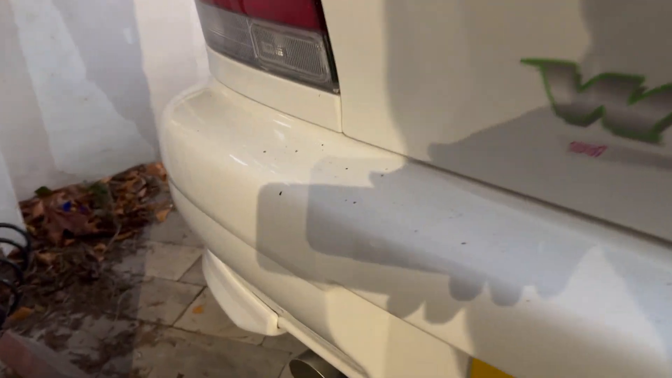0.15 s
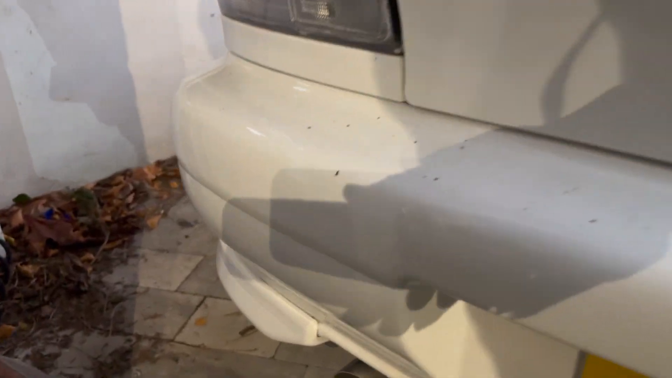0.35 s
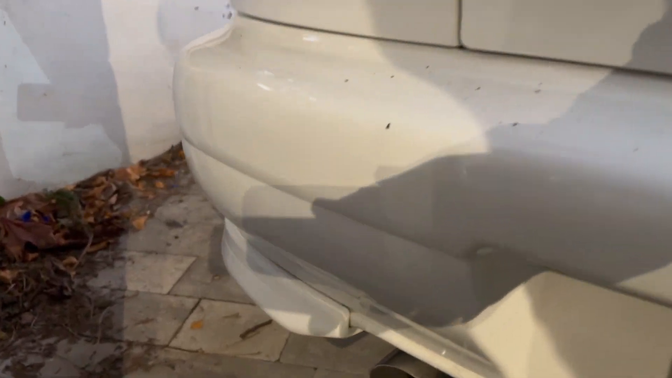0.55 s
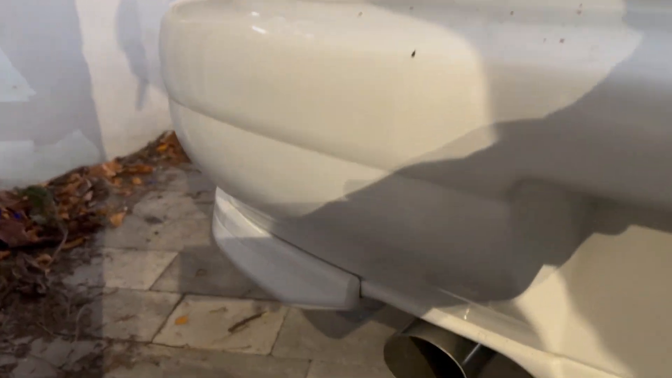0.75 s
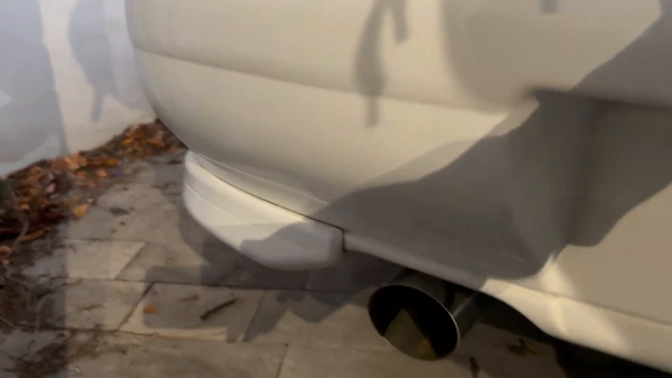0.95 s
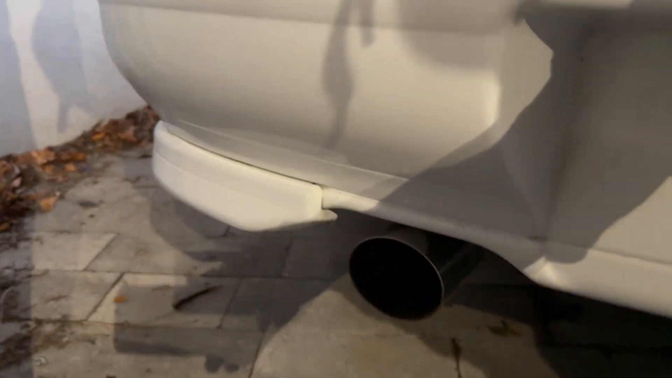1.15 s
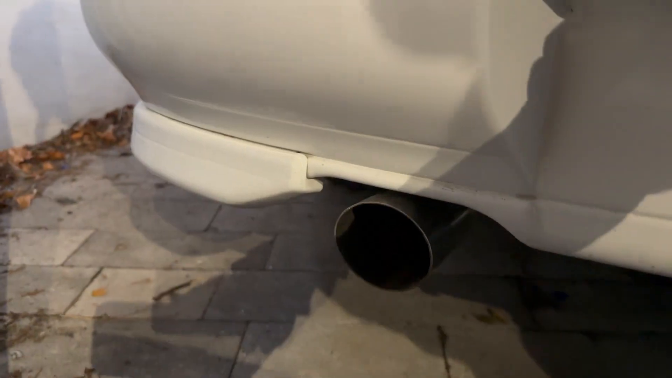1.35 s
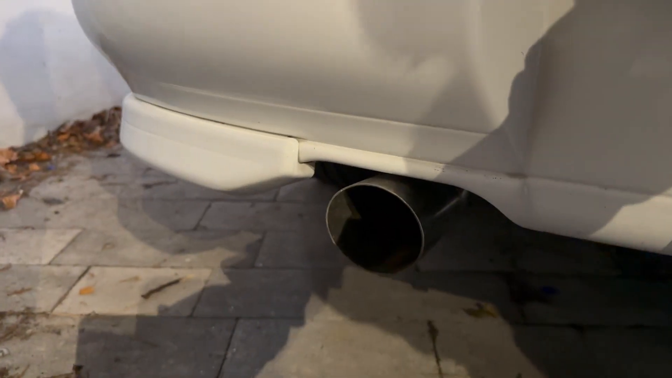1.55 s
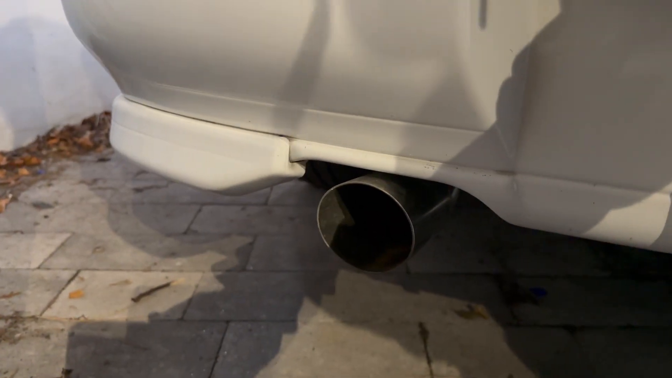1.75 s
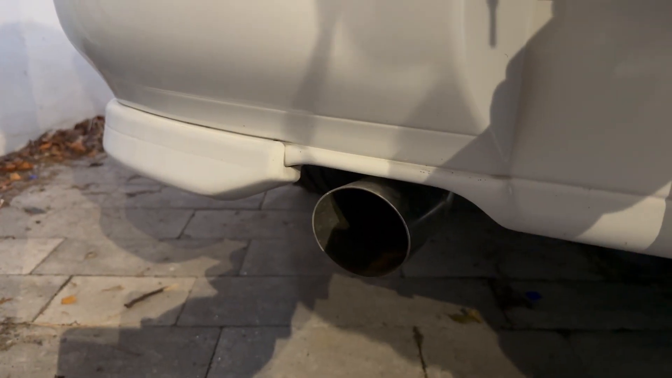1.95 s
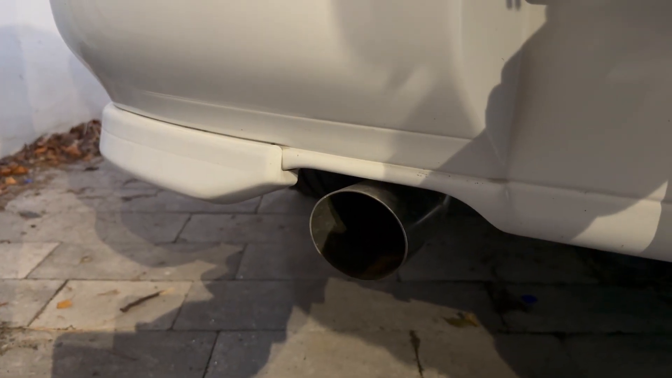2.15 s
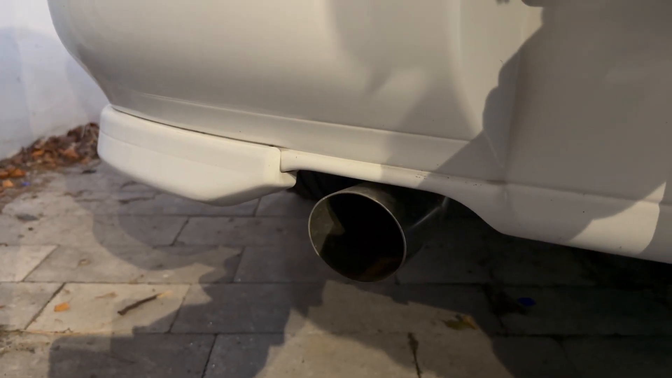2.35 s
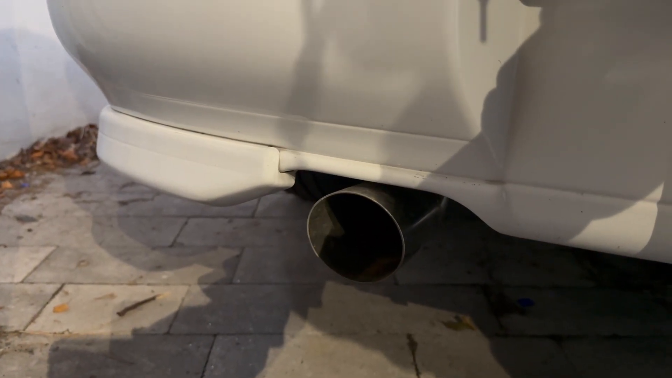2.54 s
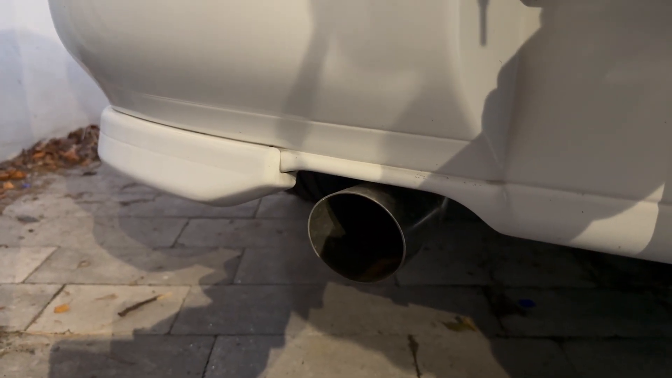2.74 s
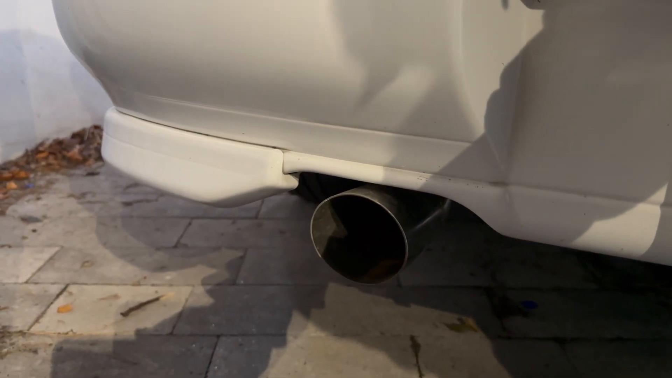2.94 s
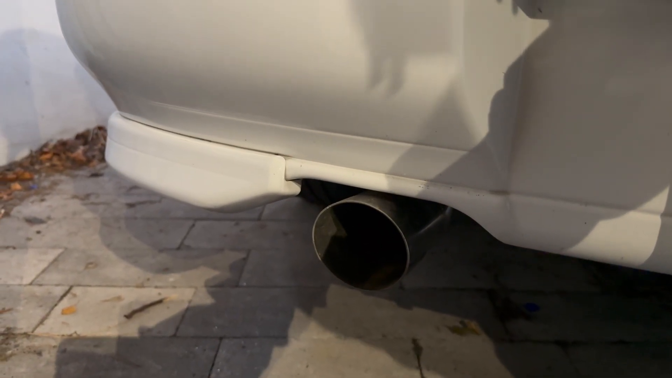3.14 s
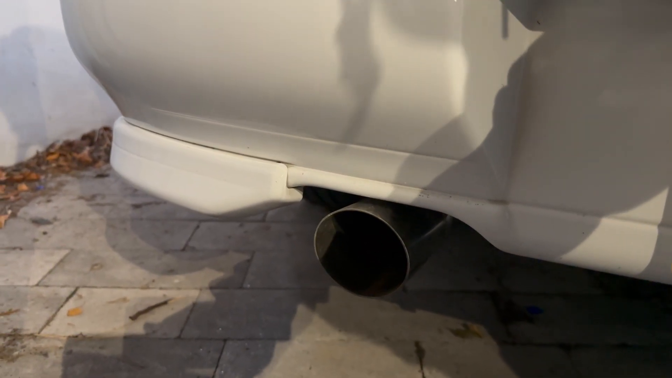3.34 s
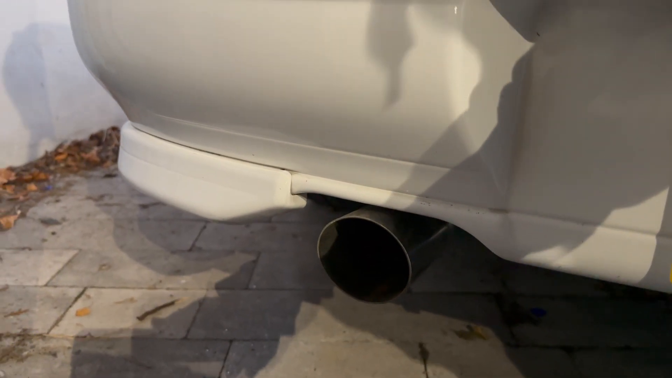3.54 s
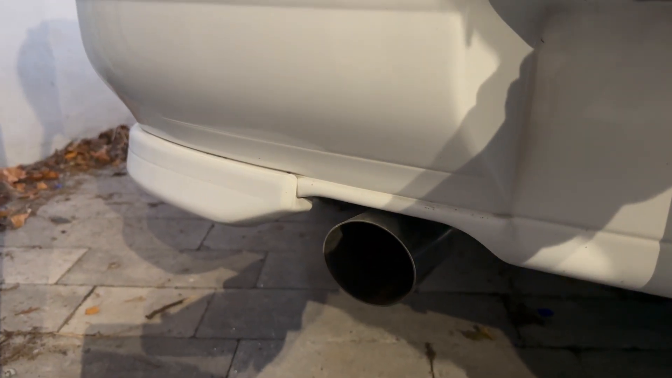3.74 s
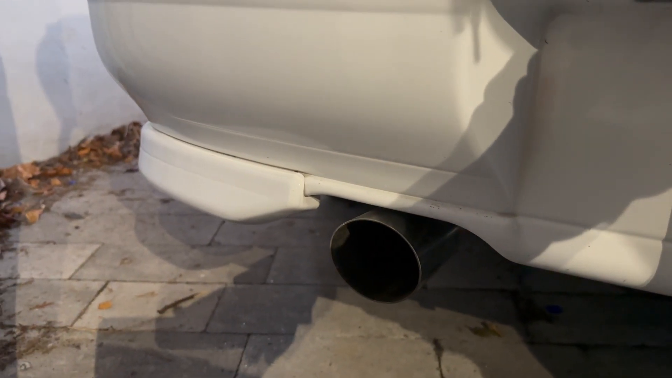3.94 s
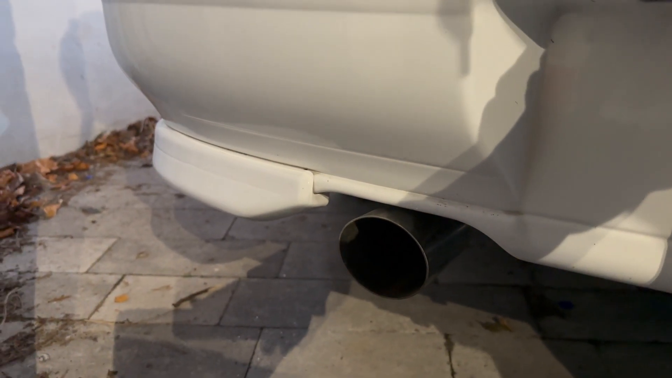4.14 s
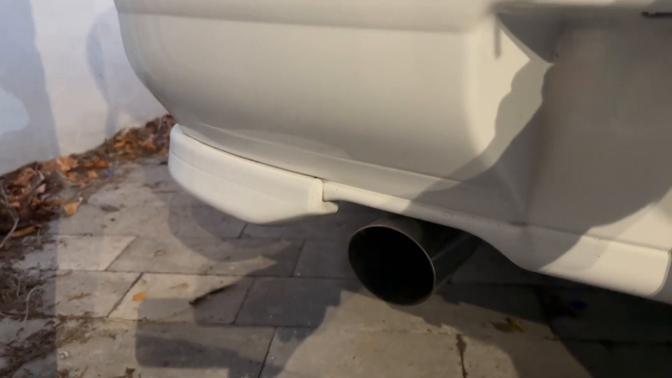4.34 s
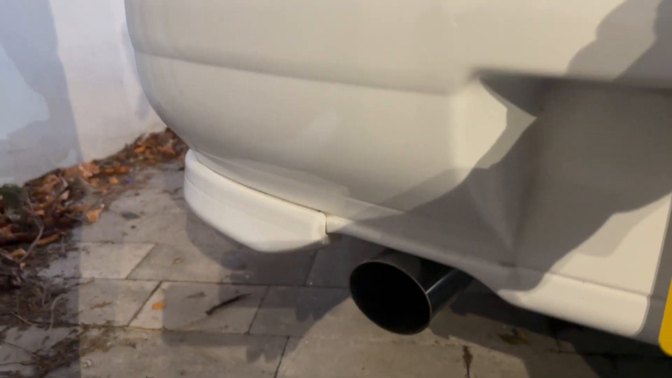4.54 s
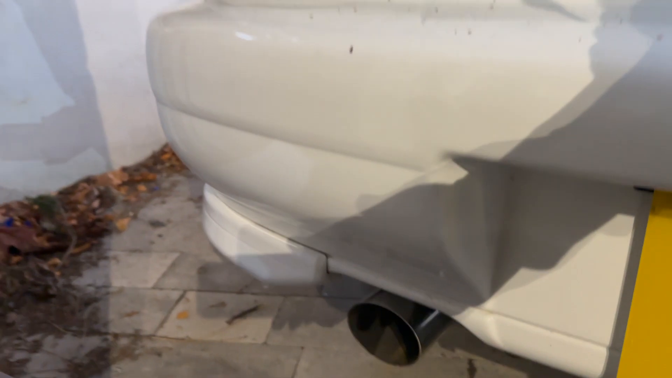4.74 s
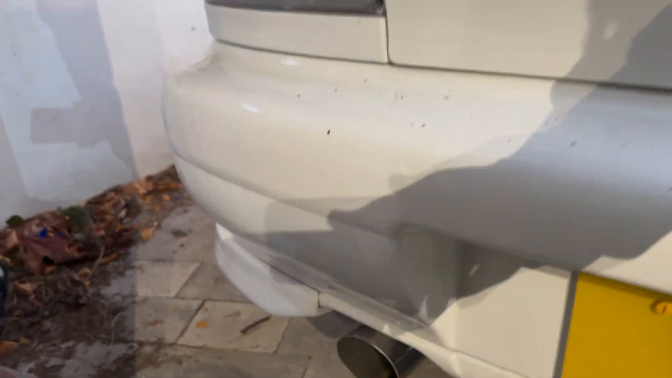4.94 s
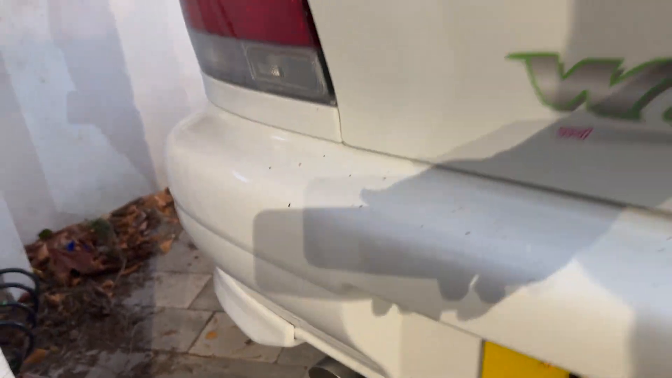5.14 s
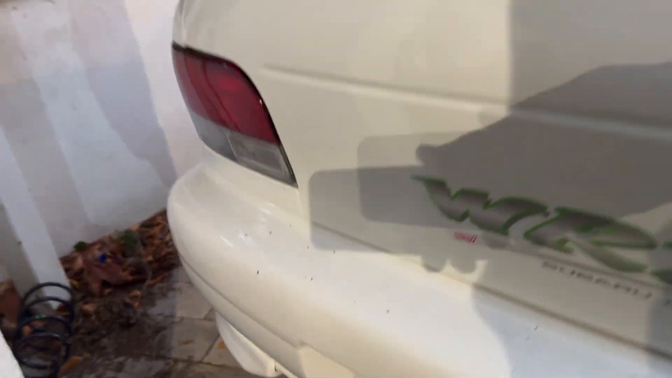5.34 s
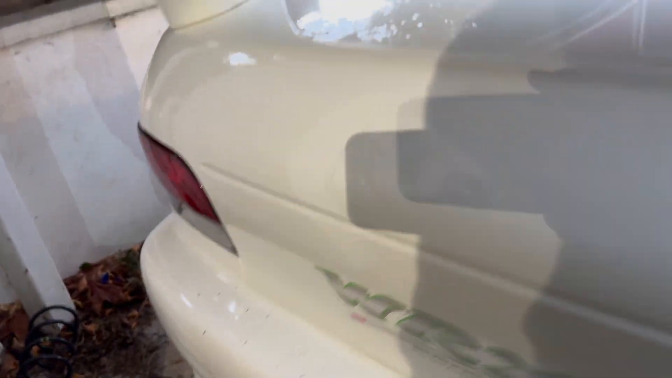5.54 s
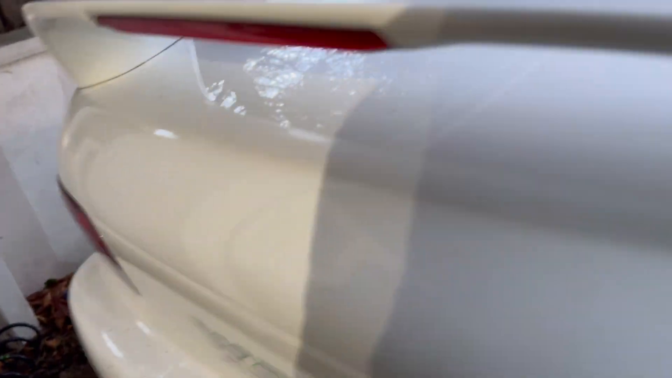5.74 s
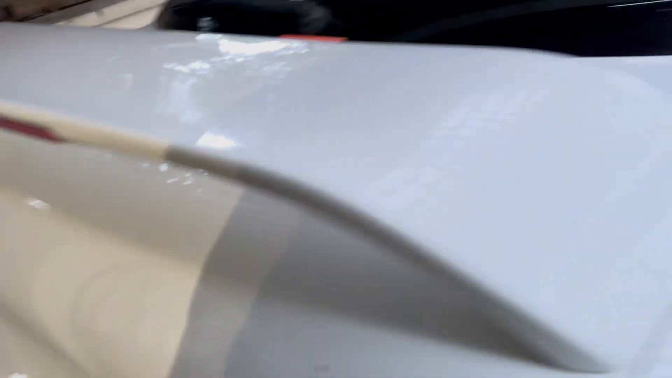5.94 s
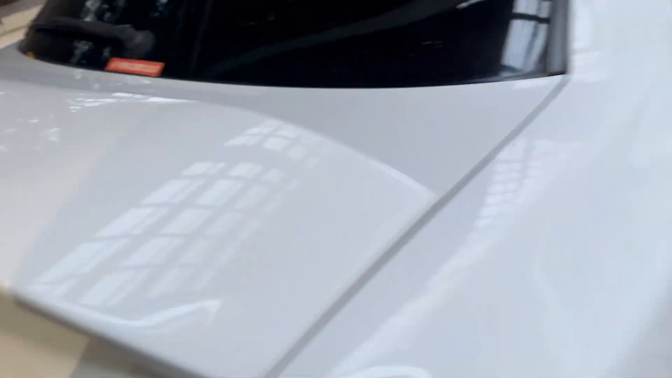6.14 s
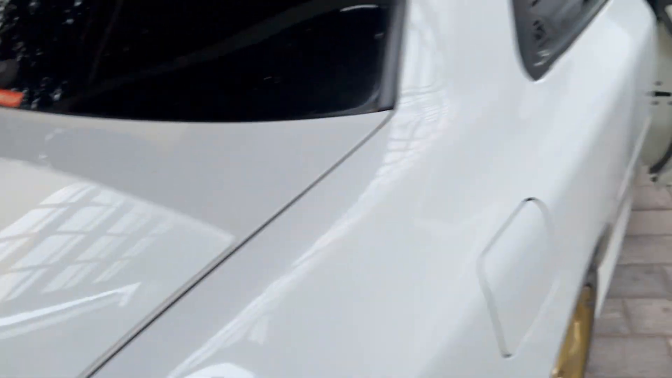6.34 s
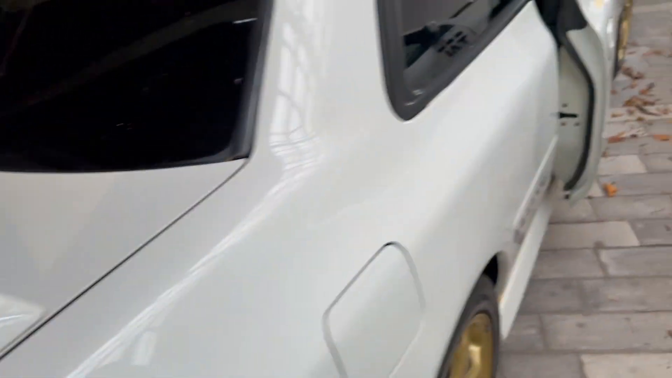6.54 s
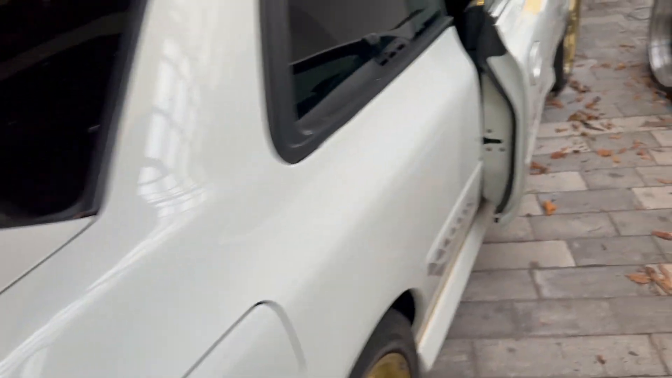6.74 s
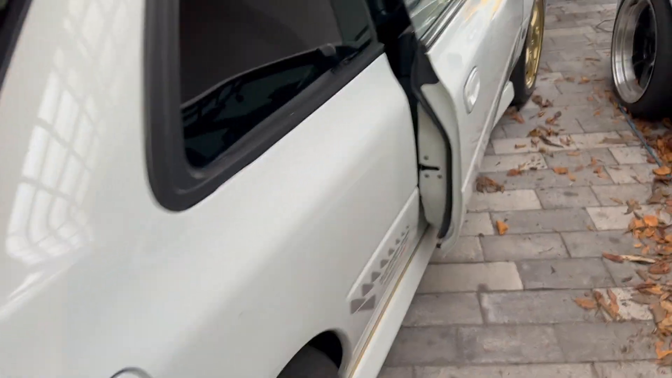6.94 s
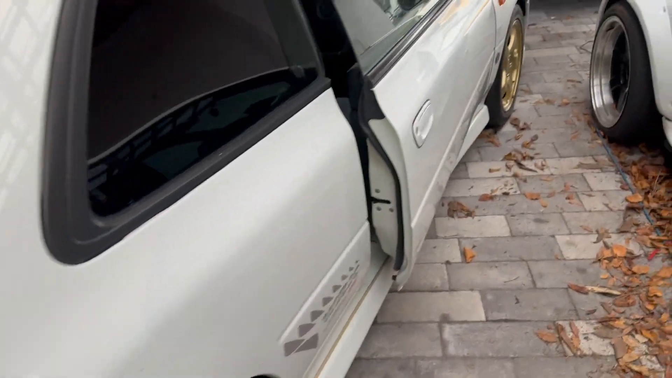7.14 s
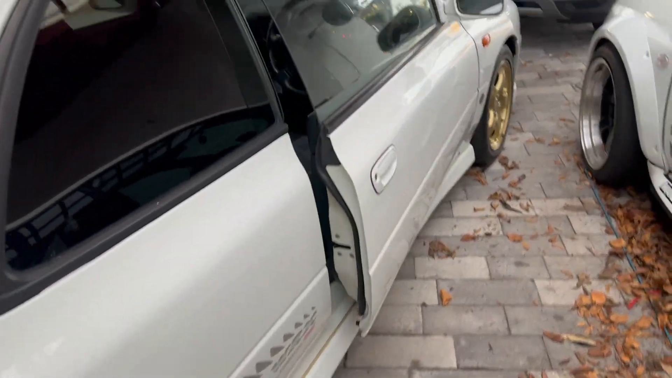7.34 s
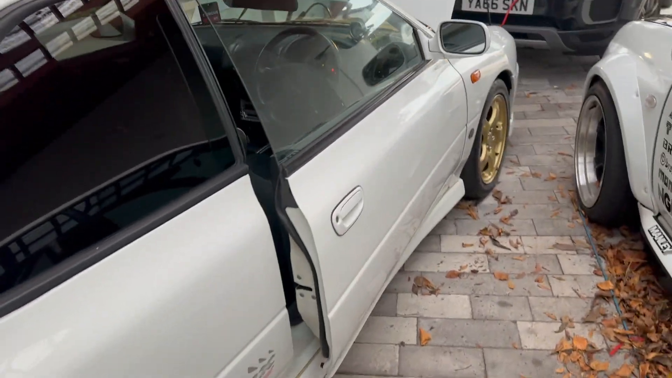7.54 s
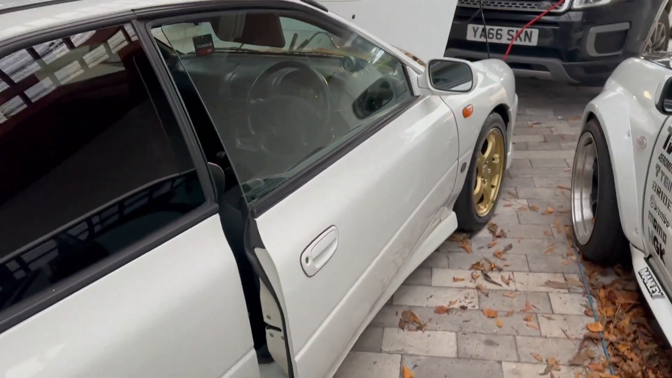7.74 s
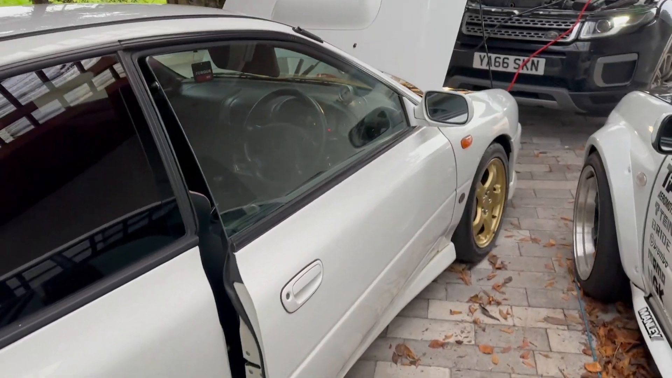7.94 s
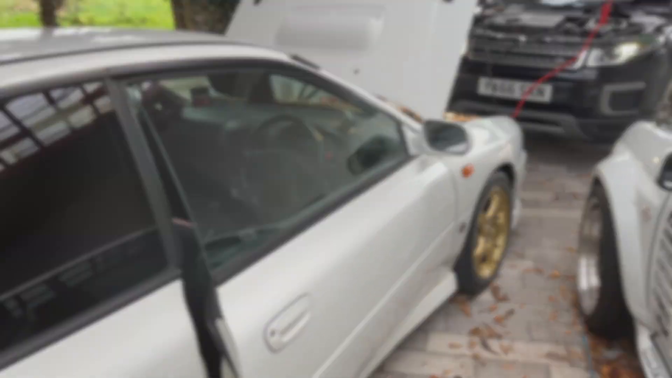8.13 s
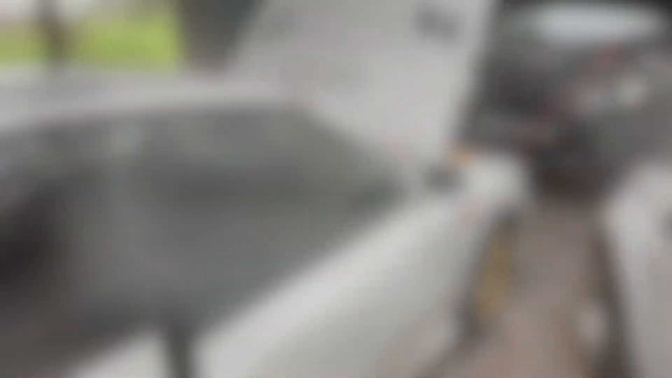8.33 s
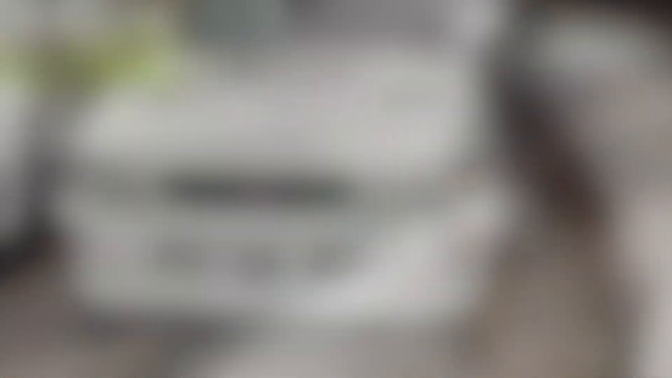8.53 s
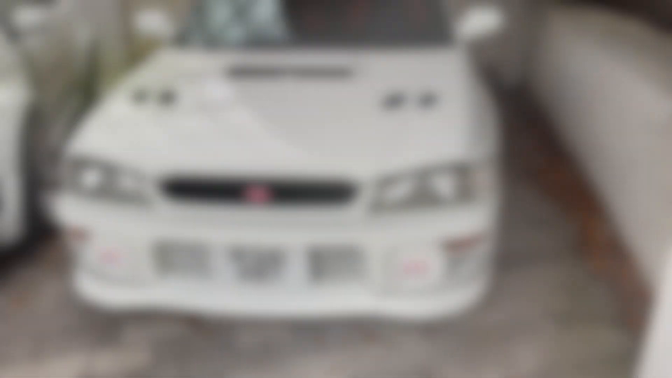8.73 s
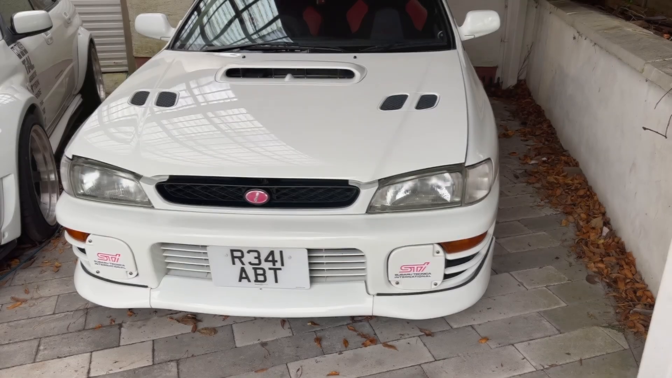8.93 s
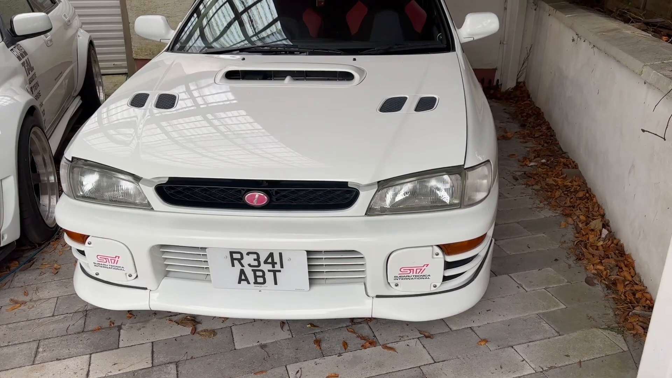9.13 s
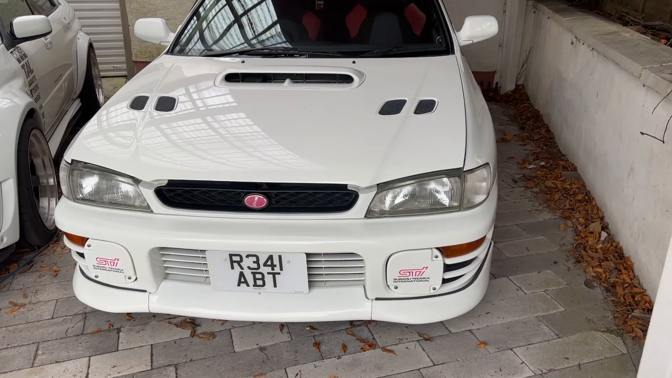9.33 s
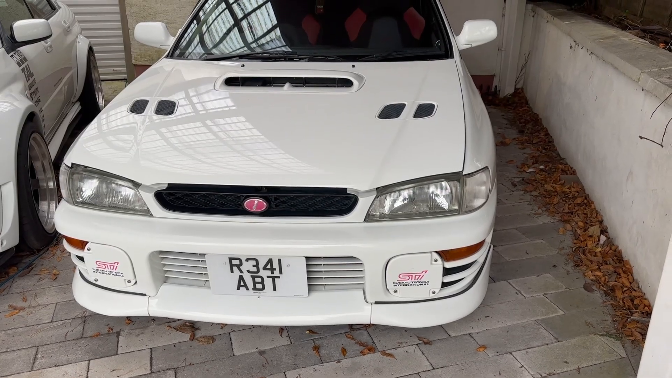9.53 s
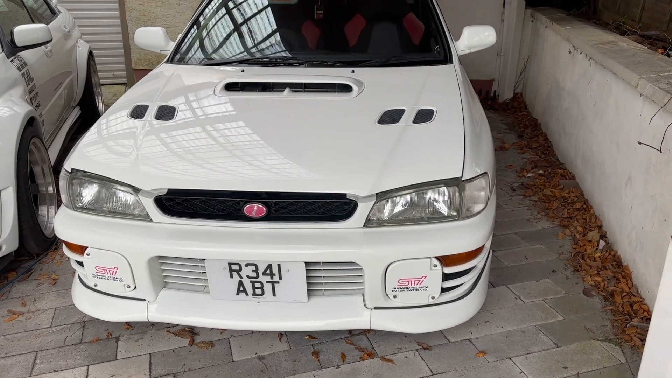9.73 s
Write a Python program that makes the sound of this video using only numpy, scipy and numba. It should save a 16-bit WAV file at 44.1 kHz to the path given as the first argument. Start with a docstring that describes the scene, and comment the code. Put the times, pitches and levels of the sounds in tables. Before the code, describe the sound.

A lumpy four-cylinder idle burbles from a big exhaust, very near and bassy, with spitting, hollow gas puffs and a single thump. After a tiny shoe scrape the microphone walks forward along the car, losing rasp and level while engine-bay hiss and faint fan tones grow. A smooth cross-fade then brings the front of the car, with a steady low drone, ticking valves and whirring belts, outdoors by hard walls.

```python
"""A flat-four idles with a lumpy exhaust throb; each firing barks and puffs gas, some spit, one pops, and a shoe scuffs once.
The listening point is near the tailpipe, then moves along the car while the lope evens out into a hum.
Near the end it cross-fades to the front: a slower idle with a low drone, belt whine and valve ticks.
Uneven pulses ring exhaust modes for the throb; filtered pulses make the bark, and noise puffs the gas.
Wavering sines make the whine, pulsed noise and resonances the ticks, and a short burst of noise the scuff."""
import sys
import numpy as np
from scipy import signal
from scipy.fft import rfft, irfft
from scipy.io import wavfile
from scipy.ndimage import uniform_filter1d
from numba import njit

SR = 44100
rng = np.random.default_rng(int(sys.argv[2]) if len(sys.argv) > 2 else 0)


def master_out(mix):
    """Clip the mix to full scale and print it as 16-bit PCM to the path in sys.argv[1]."""
    frames = np.transpose(np.atleast_2d(mix))
    ceiling = np.clip(frames, -1, 1)
    pcm = np.round(ceiling * 32767).astype(np.int16)
    wavfile.write(sys.argv[1], SR, pcm)


N = 435708
T = np.arange(N) / SR

# slowly hunting idle speed at the rear: t/s, four-stroke cycles per second/Hz
REAR_IDLE = [(0.0, 11.707), (0.6, 11.519), (1.25, 11.665), (1.8, 11.505), (2.05, 11.732), (2.7, 11.876),
             (3.2, 11.48), (3.5, 11.422), (4.25, 11.869), (4.95, 11.485), (5.35, 11.447), (5.9, 11.604),
             (6.65, 11.527), (7.2, 11.874)]
# path along the car: t/s, share of the way from pipe to door/0-1, engine bay hiss level/dB
PATH = [(0, 0.4, -49.5), (.7, 0.27, -49.5), (2, 0.44, -51.5), (4.6, 0.43, -55.5), (5.7, 0.78, -55.5),
        (6.2, 0.93, -54.5), (7.2, 0.99, -52), (8.2, 1, -50)]
# colour of the direct bark and the pop: f/Hz, relative level/dB
BARK_COLOUR = [(310, 2), (400, 1), (475, 1.5), (560, 1.5), (650, -4), (715, -9.5), (750, -6.5),
               (830, -10.5), (910, -11), (980, -18.5), (1040, -16.5), (1300, -34.5)]
# overall colour of bright noise, with a dip near 11 kHz: f/Hz, relative level/dB
BRIGHT_COLOUR = [(2500, -6.5), (3200, -10.5), (4200, 0.5), (6000, -3), (7200, -1), (8500, -2.5), (9600, -3),
                 (11000, -24), (15000, -5.5)]
POP_S = 3.0005


def undb(db):
    """Decibels to amplitude gain."""
    return 10 ** (np.asarray(db) / 20)


def unit(x):
    """Scale to rms 1."""
    return x / np.sqrt(np.mean(x ** 2))


def curves(rows):
    """Join each column of a table by straight lines in time."""
    s, *columns = np.transpose(rows)
    return [np.interp(T, s, column) for column in columns]


def wander(rate_hz):
    """Smoothed random steps give a slow drift with a spread near 1."""
    hold = int(SR / rate_hz)
    steps = np.repeat(rng.standard_normal(N // hold + 1), hold)
    return 1.1 * uniform_filter1d(uniform_filter1d(steps, hold), hold)[:N]


def air(side_db):
    """Stereo white noise; the side level against the middle sets its width."""
    mid, side = rng.standard_normal((2, N))
    return unit(mid + undb(side_db) * side * np.array([[1], [-1]]))


def colour(x, points, size=4096):
    """Minimum-phase filter through f/Hz, level/dB points, with steep falls beyond both ends; rms 1."""
    hz, db = np.transpose(points)
    octave = np.log2(np.maximum(np.arange(size // 2 + 1) * SR / size, 1))
    knots = np.log2(hz)
    beyond = np.minimum(np.abs(octave - np.clip(octave, knots[0], knots[-1])), 2)
    cepstrum = irfft(np.log(undb(np.interp(octave, knots, db) - 30 * beyond)))
    # folding the cepstrum makes the filter causal
    cepstrum[1:size // 2] *= 2
    cepstrum[size // 2 + 1:] = 0
    response = irfft(np.exp(rfft(cepstrum)))
    return unit(signal.fftconvolve(np.atleast_2d(x), response[None], axes=1)[:, :N])


def resonate(x, modes):
    """Sum band-pass filters (f/Hz, width/Hz, level/dB) of alternating polarity; rms 1."""
    total = 0
    for k, (hz, width, db) in enumerate(modes):
        mode = signal.lfilter(*signal.iirpeak(hz, hz / width, fs=SR), x)
        total = total + (-1) ** k * undb(db) * mode
    return unit(total)


@njit
def ring(x, hz, width):
    """State-variable band-pass whose centre frequency moves."""
    y, band, low = np.empty(len(x)), 0., 0.
    for i in range(len(x)):
        g, k = np.tan(np.pi * hz[i] / SR), width / hz[i]
        v = (band + g * (x[i] - low)) / (1 + g * (g + k))
        band, low, y[i] = 2 * v - band, low + 2 * g * v, k * v
    return y


def sweep(x, hz, width_hz):
    """Pass both channels through a moving resonance; rms 1."""
    return unit(np.array([ring(channel, hz, float(width_hz)) for channel in x]))


def echoes(x, fall_s):
    """Dense reflections off paving and walls smear pulses without colouring them; rms 1."""
    t = T[:N // 40]
    response = rfft(rng.standard_normal((2, len(t))) * np.exp(-t / fall_s))
    response = response + 2 * response[0]  # a shared part narrows the stereo image
    tails = irfft(response / np.abs(response))[:, :len(t) // 2]
    return unit(signal.oaconvolve(x[None], tails, axes=1)[:, :N])


def fire(idle, places, db, scatter_db, lag_s=0, jitter_s=0):
    """Pulses at set places in each engine cycle, with random strength and optional random timing."""
    turns = np.cumsum(curves(idle)[0]) / SR
    when = (np.arange(-1, int(turns[-1]) + 1)[:, None] + places).ravel()
    louder, later = rng.standard_normal((len(when), 2)).T
    strength = undb(np.resize(db, len(when)) + scatter_db * louder)
    at = np.searchsorted(turns, when) + ((lag_s + jitter_s * later) * SR).astype(int)
    running = when > -1 / 10  # keeps pulses due just before the start
    return np.bincount(np.maximum(at, 0), strength * running, minlength=N)[:N]


def kicks(s, db):
    """Single pulses at given times."""
    return np.bincount((np.asarray(s) * SR).astype(int), undb(db), minlength=N)


def puffs(pulses, rise_s, fall_s):
    """Envelope that swells after each pulse and dies away; rms 1."""
    for s in (rise_s, fall_s):
        pulses = signal.lfilter([1], [1, -np.exp(-1 / (s * SR))], pulses + 1e-18)
    return unit(pulses)


def boom(pulses, modes, moved):
    """Firings pass a bass-only silencer and a bank of narrow bands whose balance shifts with place."""
    silencer = signal.butter(5, [40, 300], "band", fs=SR, output="sos")
    here = [(hz, width, db + moved * change) for hz, width, db, change in modes]
    return unit(resonate(signal.sosfilt(silencer, pulses), here))


def whine(lines, speed, waver, flutter_db):
    """Sine tones (f/Hz, level/dB) follow a speed ratio while pitch and level wander."""
    out = 0
    for hz, db in lines:
        phase = 2 * np.pi * np.cumsum(hz * speed * (1 + waver * wander(30))) / SR
        out = out + np.sqrt(2) * undb(db + flutter_db * wander(12)) * np.sin(phase)
    return out


def exhaust():
    """Uneven firings ring the pipe into a throb, with bark and gas; the lope evens out along the car."""
    # firings: place in cycle/0-1, strength in line with the pipe/dB
    firings = [(0.176, 0.0), (0.423, -0.4), (0.678, -9), (0.935, -4.3)]
    # the same firings away from the line of the pipe: strength/dB
    aside_db = [2.5, 3, -5.5, -4.5]
    # exhaust resonances: f/Hz, width/Hz, level at the pipe/dB, change beside the car/dB
    tail_modes = [(49.13, 4.64, -8.5, 5.5), (94.4, 72, -8, -2.5), (126.2, 8.23, 3, 4.5),
                  (174.7, 12.1, -10.5, 7), (223.3, 62, -15.5, 2.5), (280.8, 10, -16.5, 2)]
    # distance from the tailpipe: t/s, distance/m
    distance = [(0, 0.66), (.4, 0.7), (1.25, 0.42), (2.0, 0.48), (3.0, 0.47), (4.35, 0.44), (5.2, 1.17),
                (5.9, 2.13), (6.5, 3.87), (8.1, 2.7)]
    # how nearly the listening point faces into the pipe: t/s, alignment/0-1
    aim_path = [(0, 0.3), (0.603, 0.1), (1.198, 0.85), (4.201, 0.88), (4.8, 0.1), (8.2, 0.3)]
    # evening of the lope into a hum: t/s, share of even firings/0-1
    evening = [(5.4, 0), (6.3, 0.2), (7.25, 0.25), (7.75, 0.9)]
    boom_1m_db, bark_1m_db = -14.5, -36  # mix gains at 1 m
    notch_hz, notch_width_hz = 436, 51
    ease_db = -3  # throb and bark soften after the pop

    metres = np.maximum(curves(distance)[0], 1 / 10)
    beside, aim, even = (np.clip(curves(table)[0], 0, 1) for table in (PATH, aim_path, evening))
    places, firing_db = np.transpose(firings)
    in_line = fire(REAR_IDLE, places, firing_db, scatter_db=0.56)
    aside = fire(REAR_IDLE, places, aside_db, scatter_db=0.62)
    loping = aim * in_line + (1 - aim) * aside
    steady = undb(-1.5) * fire(REAR_IDLE, places, [0], scatter_db=1.5)
    throb = boom((1 - even) * loping + even * steady, tail_modes, beside)
    note = undb(boom_1m_db) * throb + undb(bark_1m_db) * bark(beside, aim, even, steady)
    # the tailpipe cancels one narrow band
    note = signal.lfilter(*signal.iirnotch(notch_hz, notch_hz / notch_width_hz, fs=SR), note)
    effort = undb(np.interp(T, [POP_S, POP_S + 0.034], [0, ease_db]))
    return effort * note / metres + rasp(beside, aim)


def bark(beside, aim, even, steady):
    """Steep pulse fronts bark with turbulence behind them; off the pipe's line they scatter into a mutter."""
    # fronts, the second firing split in three by unequal headers: place in cycle/0-1, strength/dB
    steep_fronts = [(0.229, 0), (0.481, -9), (0.526, -8), (0.576, -8.5), (0.742, -5), (0.993, -5)]
    # colour of the mutter under the bumper: f/Hz, relative level/dB
    under_colour = [(310, -5), (400, -5.5), (490, 2.5), (560, -2), (660, -5.5), (735, -16.5), (900, -14),
                    (1150, -27)]
    # level of that mutter within the bark: t/s, level/dB
    mutter = [(0, -6), (1.2, -4.5), (3.0, -8.5), (4.4, -5), (5.0, -2.5), (5.7, -1.5), (6.15, -3),
              (8.2, -18.5)]
    # colour of the bark beside the car: f/Hz, relative level/dB
    side_colour = [(300, -1), (360, -0.5), (400, -1), (480, -7), (600, -14), (720, -16.5), (1000, -27)]
    beside_db = 4  # bark that escapes under the sill

    fronts = fire(REAR_IDLE, *np.transpose(steep_fronts), scatter_db=1.2, jitter_s=.00016)
    turbulence = undb(-12) * air(side_db=-8) * puffs(fronts, rise_s=.001, fall_s=.009)
    direct = colour(unit(fronts) + turbulence, BARK_COLOUR)
    direct = undb(1.7) * (1 - beside) * (0.73 + .45 * aim) * direct
    under = colour(echoes(fronts, fall_s=.01) + 2.2 * turbulence, under_colour)
    side_pulses = (1 - even) * fronts + even * steady / 2
    side = colour(echoes(side_pulses, fall_s=.02) + 1.5 * turbulence, side_colour)
    return direct + undb(curves(mutter)[0]) * under + undb(beside_db) * beside ** 2 * side


def rasp(beside, aim):
    """Pulsed noise rasps and rings in the pipe, then fizzes at its rim a few milliseconds later."""
    # gas spits, against an ordinary puff: t/s, added rasp pulse level/dB, added fizz pulse level/dB
    spit_table = [(0.412, -2, -11.5), (0.493, -3.5, -9), (0.583, 0.5, -13.5), (0.668, 0, -8),
                  (0.842, 2.5, -10.5), (0.992, -9, -3.5), (1.187, 0.5, 3), (1.359, -4, 1),
                  (1.790, -3.5, -0.5), (1.877, -2.5, -0.5), (2.219, -6.5, -2.5), (2.386, -8, -2),
                  (2.512, 0.5, -7), (2.575, -1.5, -10), (3.000, 0, -1), (3.109, 2, -6), (3.154, -4, -3.5),
                  (3.195, 1, -8.5), (3.239, -2, -4), (3.327, -1, -4), (3.413, -1, -4.5), (3.588, 4, -1.5),
                  (3.678, -3, -3), (4.984, 0.5, -10), (5.137, 5.5, -7), (5.31, 5.5, -11.5)]
    # gas colour in line with the pipe: f/Hz, relative level/dB
    gas_colour = [(710, -30), (1200, 3.5), (1270, -14.5), (1370, 4), (1540, -1), (1760, -7), (1900, 2),
                  (1990, -0.5), (2350, 1.5), (2470, -2.5), (2700, -25), (3200, -34), (4160, -58),
                  (7040, -120)]
    # gas colour off the line of the pipe: f/Hz, relative level/dB
    above_colour = [(650, -14.5), (900, 2.5), (1100, 1), (1200, 3), (1330, -2.5), (1440, 6), (1590, -22),
                    (1680, -7), (1770, -6.5), (1970, -3), (2410, -19), (2650, -11), (3020, -29.5),
                    (3200, -29), (4160, -47.5), (7040, -120)]
    # steel tip resonances: f/Hz, width/Hz, level/dB
    tip_modes = [(1510, 30, -6), (9600, 45, -26.5), (9800, 40, -25.5)]
    # hollow ring that shifts with place: t/s, f/Hz, level/dB
    hollow_ring = [(0, 2130, -9), (.3, 2130, -7), (.55, 1974, 2.5), (.68, 1882, -3.5), (.85, 2100, 0),
                   (1.3, 2330, -4), (4.2, 2393, -4), (4.7, 2120, 2.5), (5.0, 2073, -0.5), (5.35, 1912, 2.5),
                   (5.8, 1880, -5)]
    # lower ring that shifts with place: t/s, f/Hz, level/dB
    low_ring = [(0, 1384, -1), (.45, 1470, -9), (.9, 1402, -7), (2.2, 1530, -10), (3.35, 1570, 2),
                (4.1, 1474, -7.5), (4.7, 1413, 1.5), (5.35, 1437, 0.5), (5.8, 1430, -9)]
    hollow_width_hz, low_width_hz = 125, 96
    rasp_db, fizz_db = -46.5, -63  # mix gains at the start
    settle_db_per_s = 1.75  # the gas quietens as the cold engine settles

    s, spit_rasp_db, spit_fizz_db = np.transpose(spit_table)
    spits = kicks(s, spit_rasp_db)
    exposed = 1 - .87 * beside
    flow = exposed * gas_flow(scatter_db=2.6, extra=spits) + 0.15
    jet = air(side_db=-1) * flow
    in_line = colour(jet, gas_colour) + undb(-9.0) * resonate(jet, tip_modes)
    gas = aim * in_line + (1 - aim) * undb(1.5) * colour(jet, above_colour)
    rings = 0
    for table, width in ((hollow_ring, hollow_width_hz), (low_ring, low_width_hz)):
        hz, db = curves(table)
        pulsed = air(side_db=-8) * gas_flow(scatter_db=3.5, extra=spits)
        rings = rings + undb(db) * sweep(pulsed, hz, width)
    rings = signal.sosfilt(signal.butter(4, 2700, fs=SR, output="sos"), rings)
    rim = gas_flow(scatter_db=1.3, extra=kicks(s + .003, spit_fizz_db), lag_s=.004)
    fizz = colour(air(side_db=-3.5) * (rim + 0.1), BRIGHT_COLOUR) * (1 - beside ** 2)
    mix = undb(rasp_db) * (gas + exposed * rings) + undb(fizz_db) * fizz
    return undb(-settle_db_per_s * T) * mix


def gas_flow(scatter_db, extra, lag_s=0):
    """Each firing's puff of gas swells and dies within a few milliseconds."""
    # puffs: place in cycle/0-1, strength/dB
    gas_puffs = [(0.218, -1), (0.462, -1), (0.733, 2.5), (0.977, 0)]
    pulses = fire(REAR_IDLE, *np.transpose(gas_puffs), scatter_db, lag_s)
    return puffs(pulses + extra, rise_s=0.0013, fall_s=0.0034)


def pop():
    """One firing burns much harder: a single coloured pulse thumps out of the pipe."""
    thump = colour(kicks([POP_S], [0]), BARK_COLOUR)
    return undb(-13) * thump / np.abs(thump).max()  # peak gain before the rear mix


def front():
    """The exhaust drones under the car, panels buzz, and valves clatter in the rush of the belts."""
    # idle speed: t/s, four-stroke cycles per second/Hz
    idle = [(8, 9.85), (8.9, 9.9), (9.25, 10.0), (9.88, 10.1)]
    # firings: place in cycle/0-1, strength/dB
    firings = [(0.244, 0.0), (0.494, -1.035), (0.694, -4.454), (0.994, -7.817)]
    # filter bands shaping the drone; a close pair of opposite polarity makes one steep peak:
    # f/Hz, width/Hz, level/dB, change as the listening point steps aside/dB
    drone_bands = [(47, 5.8, -23.5, 0.5), (84.63, 8.3, 1.5, 4), (84.3, 9.17, 1.38, 3.5),
                   (109.6, 11.8, -10, -6), (136.8, 17, -14.5, -5.5), (152.2, 9.8, -9.5, -4.5),
                   (194, 26, -20, 4), (239.2, 11, -20.5, 2.5), (270, 340, -35.5, -4)]
    # panel colour: f/Hz, relative level/dB
    body_colour = [(160, -36.5), (280, 6.5), (315, 1.5), (361, -4), (387, -14.5), (475, -10.5), (516, -9),
                   (570, -18), (680, -18), (804, -34.5), (900, -23), (1170, -39), (1980, -120)]
    # clatter and rush colour: f/Hz, relative level/dB
    bay_colour = [(400, 8.5), (700, -3.5), (980, -4), (1300, -8.5), (2000, -10.5), (2900, -13.5),
                  (3800, -16), (5200, -17.5), (6200, -22), (7100, -20.5), (9500, -21.5), (11000, -44.5),
                  (14000, -21.5), (16000, -37)]
    # metal parts rung by the valve gear: f/Hz, width/Hz, level/dB
    bay_modes = [(1150, 30, -5.5), (1884, 26, -0.5), (2370, 47, -1.5), (2860, 32, -0.5), (3290, 70, -6)]
    # belt and pulley tones: f/Hz at 10 cycles per second, level before the front gain/dB
    belt_tones = [(357, -44.5), (517, -45), (603, -57.5), (972, -53.5), (7085, -72), (8020, -76)]
    # rising whirr of a pulley: t/s, f/Hz
    whirr = [(8.4, 942), (9.0, 957), (9.35, 972), (9.88, 984)]
    whirr_width_hz, whirr_db = 43, -54.5
    clatter_db, bay_ring_db = -48, -55

    pulses = fire(idle, *np.transpose(firings), scatter_db=0.9)
    drone = boom(pulses, drone_bands, moved=np.interp(T, [8.9, 9.6], [0, 1]))
    buzz = undb(-7) * echoes(pulses, fall_s=.02) + undb(-18) * air(side_db=-8)
    panels = colour(unit(pulses) + buzz, body_colour)
    # each valve ticks once a cycle with a clatter of its own
    valve_places = np.linspace(0, 1, 8, endpoint=False)
    valves = [fire(idle, [place], [0], scatter_db=3, jitter_s=.00015) for place in valve_places]
    clatter = colour(sum(echoes(valve, fall_s=.012) for valve in valves), bay_colour)
    ticks = puffs(sum(valves), rise_s=.0003, fall_s=0.018)
    rings = resonate(air(side_db=-13) * ticks, bay_modes)
    rush = colour(air(side_db=0) * (1 + 0.12 * ticks), bay_colour)
    bay = undb(-41.5 + .5 * wander(9.9)) * rush
    bay = bay + undb(clatter_db) * clatter + undb(bay_ring_db) * rings
    # a thin hiss swells once
    swell = np.exp(-.5 * ((T - 8.85) / 0.071) ** 2)
    sizzle = resonate(air(side_db=0), [(5400, 370, 0)]) * swell
    belts = whine(belt_tones, curves(idle)[0] / 10, waver=.005, flutter_db=2.0)
    belts = belts + undb(whirr_db) * sweep(air(side_db=-5), curves(whirr)[0], whirr_width_hz)
    return undb(-16.0) * drone + undb(-34.5) * panels + bay + undb(-58.0) * sizzle + belts


def bay_from_side():
    """Coloured noise hisses from the engine bay; belt and fan tones grow along the side of the car."""
    # hiss colour: f/Hz, relative level/dB
    hiss_colour = [(400, 3.5), (520, -8.5), (680, -17.5), (900, -8), (1770, -10.5), (2310, -10),
                   (2680, -17), (7040, -27), (10000, -39)]
    # belt tone: f/Hz at the last rear idle speed, full level before the rear gain/dB
    belt_tones = [(474, -59)]
    # steady cooling fan tones: f/Hz, full level before the rear gain/dB
    fan_tones = [(400, -55.5), (800, -67.5)]

    beside, bay_db = curves(PATH)
    hiss = colour(air(side_db=-3), hiss_colour)
    hiss = hiss + undb(-13) * colour(air(side_db=-4), BRIGHT_COLOUR)
    speed = curves(REAR_IDLE)[0]
    hum = whine(belt_tones, speed / speed[-1], waver=.002, flutter_db=1.5)
    hum = hum + whine(fan_tones, 1, waver=.003, flutter_db=2.5)
    return hiss * undb(bay_db + 0.48 * wander(8.3)) + beside * hum


def scuff():
    """A sole drags briefly over the paving: flickering bright noise in a short bell-shaped swell."""
    centre_s, spread_s, scuff_db = 4.88, .025, -56
    grit_colour = [(2000, 1), (4000, 7), (6000, 5.0), (8700, 3.5), (11000, -13), (15000, -8.0)]  # f/Hz, level/dB
    grit = colour(air(side_db=-7.0), grit_colour)
    return grit * undb(scuff_db + 2 * wander(200)) * np.exp(-.5 * ((T - centre_s) / spread_s) ** 2)


def scene():
    """The rear of the car gives way to the front in a straight cross-fade."""
    fade_start_s, fade_length_s = 8.176, 0.69
    rear_db, front_db = 0.5, 4
    fade = np.clip((T - fade_start_s) / fade_length_s, 0, 1)
    rear = exhaust() + pop() + bay_from_side() + scuff()
    return (1 - fade) * undb(rear_db) * rear + fade * undb(front_db) * front()


def record(dry):
    """Two microphone ports differ in level and phase across frequency; a steep low-pass cuts the top."""
    # port differences: f/Hz, left minus right level/dB, left phase lead/rad
    port_table = [(60, 1, 0.0025), (200, -1.5, 0.26), (300, 2, 0.94), (503, 3, -0.21), (696, -1, -0.6),
                  (1060, 4.5, -0.57), (1450, 0, -0.44), (2520, -3, 0.74), (3300, 0.5, 0.21),
                  (5400, 4.5, -0.24), (7040, 7.5, 0.72), (8350, 0.5, -0.31)]
    top_hz = 15700
    hz, db, lead = np.transpose(port_table)
    log_f = np.log(np.maximum(np.arange(N // 2 + 1) * SR / N, 1))
    level = undb(np.interp(log_f, np.log(hz), db))
    ratio = level * np.exp(1j * np.interp(log_f, np.log(hz), lead))
    # the two port gains average to one
    gains = 2 * np.array([ratio, np.ones_like(ratio)]) / (1 + ratio)
    ports = irfft(rfft(dry) * gains, N)
    return signal.sosfilt(signal.ellip(8, .2, 70, top_hz, fs=SR, output="sos"), ports)


dry = scene()
out = record(dry)
master_out(out)
```